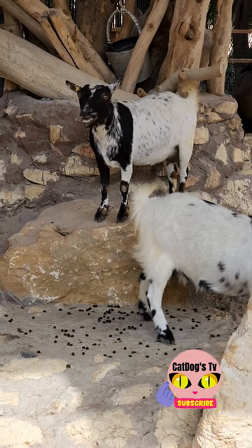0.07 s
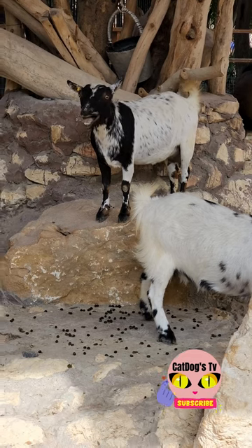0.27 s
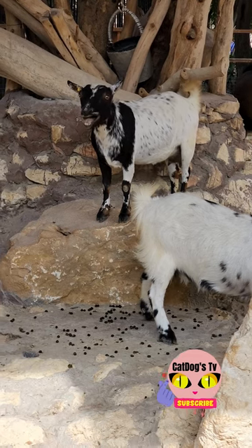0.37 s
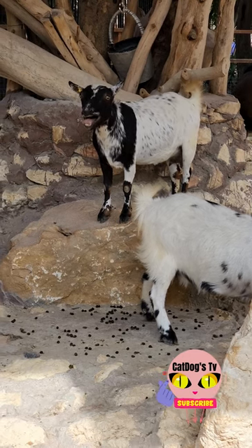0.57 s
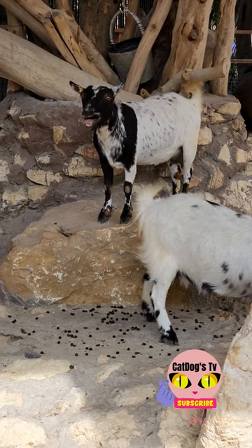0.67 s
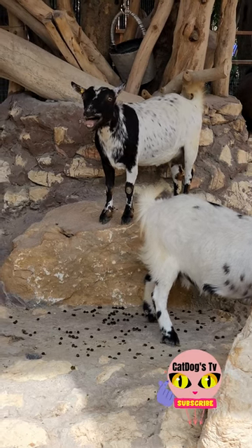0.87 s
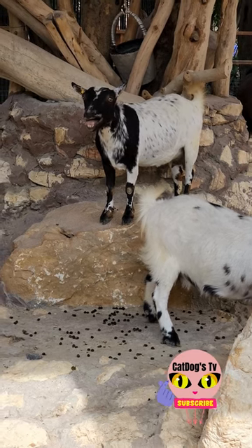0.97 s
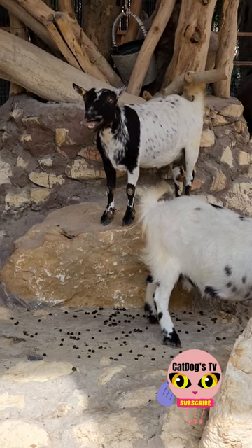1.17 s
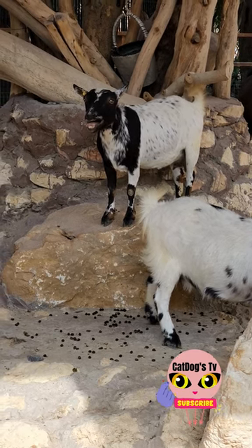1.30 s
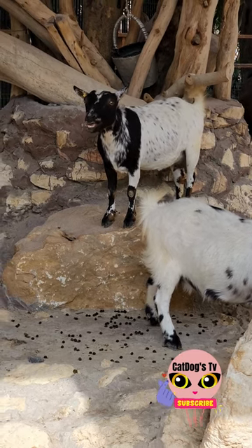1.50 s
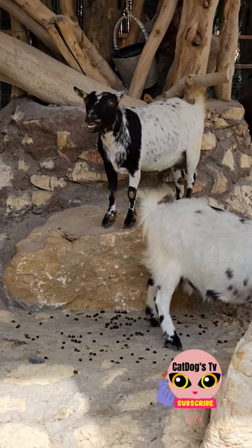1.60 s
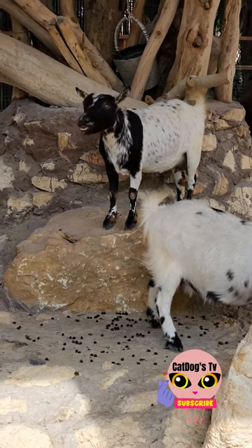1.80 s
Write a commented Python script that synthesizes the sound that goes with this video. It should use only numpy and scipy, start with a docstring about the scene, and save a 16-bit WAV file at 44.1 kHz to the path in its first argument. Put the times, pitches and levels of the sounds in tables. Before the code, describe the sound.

A goat bleats loudly outdoors, stuttering at first and then holding a long, hoarse cry.

```python
"""In a stone-walled pen, a few metres away, a goat bleats once: a stutter that grows hoarse, a long cry
that rings clear in its middle and breaks up again, then three weak last pulses. A thinner bleat from
the right overlaps the stutter, and a faint low tone slides up beneath its start. Each voice is a source
and a filter: uneven vocal-fold pulses and rasp excite the resonances of the throat.
The walls reflect both voices over a low outdoor rumble."""
import sys
import numpy as np
from scipy import signal
from scipy.fft import rfft, irfft, next_fast_len
from scipy.io import wavfile
from scipy.ndimage import uniform_filter1d

SR = 44100
rng = np.random.default_rng(int(sys.argv[2]) if len(sys.argv) > 2 else 0)


def store_wav(level_fs):
    """Save 16-bit WAV to argv[1]."""
    pcm = np.round(np.clip(np.atleast_2d(level_fs), -1, 1) * 32767)
    wavfile.write(sys.argv[1], SR, pcm.T.astype(np.int16))


N = 81585

# outdoor background spectrum: f/Hz, relative level/dB
AIR_SPECTRUM = [(20, -20), (45, -6), (75, 1.5), (105, -3.5), (160, -16.5), (300, -13.5), (500, -19),
                (1400, -17), (5000, -28.5), (15500, -43.5)]
# stutter pulses: middle t/s, length/s, pitch f/Hz, level/dB of the first resonance, mouth opening,
# second resonance and treble, roughness/(0-1)
STUTTER_PULSES = [(0.125, .034, 366, -23.5, -46, -29.5, -27, 0.24),
                  (.235, 0.054, 380.5, -26, -26, -20, -22.5, 0.33),
                  (0.351, 0.082, 389, -19.5, -29.5, -17.5, -21.5, 0.31),
                  (0.455, 0.063, 388.5, -19.5, -29.5, -14, -23, 0.37),
                  (0.565, 0.041, 390, -15.5, -22.5, -14, -16, 0.41),
                  (0.669, 0.056, 395, -21, -28, -20, -19.5, .85),
                  (0.777, 0.066, 388.7, -17, -23.5, -20, -16.5, .9),
                  (1.589, .04, 403.7, -25, -32, -33.5, -28, 0.6),
                  (1.688, 0.046, 373.6, -26, -65, -35.5, -27, 0.3),
                  (1.792, 0.026, 395, -44.5, -43, -32, -31.5, 0.17)]
# three bands of the throat's response in the stutter: f/Hz, relative level/dB
STUTTER_FIRST_FORMANT = [(150, -27), (380, -9.5), (560, -8.5), (780, 7.5), (1000, -3.5), (1400, -39.5)]
STUTTER_SECOND_FORMANT = [(1000, -56), (1350, 6), (1560, 13), (1850, -6.5), (2300, 0), (3000, -60)]
STUTTER_TREBLE_BAND = [(150, -27), (380, -17), (560, -22), (1500, -26), (2500, -4.5), (2900, 0),
                       (3500, 3.5), (4200, 1.5), (5400, -2.5), (6600, -20.5), (8300, -27.5), (10500, -38.5),
                       (15500, -41)]
# course of the nasal bleat: t/s, pitch f/Hz, level/dB
NASAL_CONTOUR = [(.1, 356.3, -34), (.18, 370, -67), (.29, 376, -48), (.38, 388, -32.5), (.415, 382, -26.5),
                 (.49, 386, -23), (.53, 392, -18.5), (.6, 397.8, -18), (.64, 389.3, -23.5), (.72, 382, -21),
                 (.8, 381.5, -26.5), (.86, 373.4, -21)]
# its throat response: f/Hz, relative level/dB
NASAL_THROAT = [(200, -30), (390, -10.5), (770, -1), (1150, -16.5), (1540, -1.5), (1950, -3.5),
                (2340, -2.5), (2700, -18.5), (4300, -10.5), (5600, -22.5), (15500, -63)]
# course of the low tone: t/s, pitch f/Hz, level/dB
SLIDE_CONTOUR = [(.1, 159.3, -70), (.14, 189, -36.5), (.19, 277.4, -39), (.24, 335, -41), (.3, 333, -88)]
# near-wall echoes: left delay t/s, right delay t/s, level/dB
WALL_ECHOES = [(.0047, .0052, -16), (0.0121, 0.0094, -7)]
# course of the cry: t/s, pitch f/Hz, first and second resonance level/dB, roughness/(0-1)
CRY_CONTOUR = [(.82, 356.1, -23, -14, 0.46), (.842, 376.7, -19.5, -15.5, 0.22),
               (.866, 412.8, -13, -12.5, 0.46), (.898, 381.4, -24.5, -25, 0.44),
               (.93, 406.2, -12.5, -15.5, 0.41), (.955, 426.2, -13, -15, 0.38),
               (.974, 394.2, -23, -15, 0.46), (1.0, 416.7, -10, -12, 0.18), (1.05, 415.4, -13, -17.5, 0.29),
               (1.075, 419.5, -10, -12, 0), (1.12, 422.2, -14, -19.5, 0.09), (1.165, 428, -10, -28.5, 0.1),
               (1.205, 438.2, -21.5, -17, 0.12), (1.25, 397.3, -13.5, -12, 0.49),
               (1.31, 401, -16.5, -15.5, .55), (1.365, 413.4, -15, -15.5, .53),
               (1.405, 413.3, -25.5, -19, 0.67), (1.43, 401.9, -16.5, -14, 0.55),
               (1.465, 390.4, -13, -13, 0.13), (1.496, 381.4, -22, -17.5, 0.24),
               (1.52, 329, -21.5, -30.5, 0.35), (1.53, 413, -24, -16, 0.57), (1.57, 377, -37, -39, .7)]
# throat response that shapes the cry's overtones: f/Hz, relative level/dB
CRY_OVERTONE_RESPONSE = [(150, -48), (280, -5.5), (410, -0.5), (540, 14), (850, -6), (1250, 1.5),
                         (1650, -2.5), (2100, 6.5), (2550, 2), (3000, 5), (3480, 11.5), (3980, -1.5),
                         (4330, -1), (4660, 6.5), (4980, -1), (5500, -2), (6200, -24), (7300, -12.5),
                         (8400, -10), (10500, -18.5), (15500, -23.5)]
# envelope of those overtones: t/s, level/dB
CRY_OVERTONE_LEVEL = [(.85, -15.5), (1.0, -18), (1.12, -19.5), (1.21, -16), (1.33, -19.5), (1.48, -17),
                      (1.57, -26)]
# the cry's shrill top resonance, which flares twice: t/s, level/dB
FLARE_LEVEL = [(1.16, -65), (1.185, -20.5), (1.225, -40), (1.25, -35), (1.37, -71), (1.4, -21.5),
               (1.44, -66)]
# phase difference between the two microphones: f/Hz, lead of left/rad
LEFT_PHASE_LEAD = [(100, -0.5), (830, 0), (1650, -0.54), (3000, -1.5), (4390, -4), (8000, -7)]
# their level difference: f/Hz, left-minus-right level/dB
LEFT_BALANCE = [(380, -6.5), (700, 1), (2400, 1.5), (5000, -1)]


def amp(db):
    """Amplitude ratio of a level in decibels."""
    return 10 ** (np.asarray(db) / 20)


def unit(x):
    """Normalisation to rms 1."""
    return x / np.sqrt(np.mean(x ** 2))


def curve(rows):
    """Linear interpolation of each column of a time table."""
    times, *columns = np.array(rows, float).T
    return [np.interp(np.arange(N) / SR, times, c) for c in columns]


def at_hz(points, hz):
    """Interpolation of a spectrum on a log-frequency axis."""
    f, value = np.array(points, float).T
    return np.interp(np.log(hz + 1e-9), np.log(f), value)


def shape(x, response):
    """Linear filtering: the spectrum is multiplied by a frequency response."""
    size = next_fast_len(2 * N)
    return irfft(rfft(x, size) * response(np.fft.rfftfreq(size, 1 / SR)), size)[..., :N]


def colour(x, points):
    """Spectral weighting by a table of levels, at rms 1."""
    return unit(shape(x, lambda f: amp(at_hz(points, f))))


def resonance(x, hz, width_hz):
    """A formant: two resonators in cascade, held near rms 1 as the pitch moves."""
    ring = shape(x, lambda f: (1j * f * width_hz / (hz ** 2 - f ** 2 + 1j * f * width_hz)) ** 2)
    return ring / np.sqrt(uniform_filter1d(ring ** 2, size=600) + 1e-12)


def wander(bandwidth_hz):
    """Smooth random fluctuation: low-passed noise at rms 1."""
    return unit(shape(rng.standard_normal(N), lambda f: np.exp(-(f / bandwidth_hz) ** 2)))


def outdoor_air(level_db=-34.5, widening_hz=1120):
    """Partly coherent noise: a rumble alike in both ears under a faint wide hiss."""
    mid, side = rng.standard_normal((2, N))
    side = shape(side, lambda f: np.minimum(f / widening_hz, .8))
    return amp(level_db) * colour(mid + side * np.array([[1], [-1]]), AIR_SPECTRUM)


def vocal_folds(hz, rough, harmonics=40, jitter=.065, flutter=.053, catch=3.08, rasp_hz=2340):
    """Glottal source: roughness unsettles the pulses, makes them catch and adds a puff of rasp to each."""
    unrest = np.abs(rough) ** 1.6
    pitch_hz = hz * (1 + jitter * unrest * wander(92.5))
    phase = 2 * np.pi * (np.cumsum(pitch_hz) / SR + flutter * unrest * wander(310))
    tone = unit(sum(np.cos(k * phase + 2 * np.pi * k * k / np.sqrt(2 * harmonics))
                    for k in range(1, harmonics + 1)))
    puffs = unit(rng.standard_normal(N) * (1 + .5 * np.cos(phase)))
    puffs = shape(puffs, lambda f: np.sqrt(1 + np.minimum(f / rasp_hz, 1)))
    rasp = unrest ** 2 / np.maximum(1.05 - rough, .1)
    catches = 1 / (1 + (catch * rough * np.maximum(wander(162), 0)) ** 2)  # dips of a cycle or two
    return (tone * catches + rasp * puffs) / np.sqrt(1 + rasp ** 2)


def stutter(scoop_hz_per_s=950, sag_hz_per_s=150, swing_s=.04, opening_lead_s=.011):
    """Amplitude and frequency modulation: about nine pushes of voice a second, each arching in pitch."""
    t = np.arange(N) / SR
    gains, contour = 0, []
    for middle, length, hz, *levels_db, rough in STUTTER_PULSES:
        away = np.abs(2 * (t - middle) / length)
        swell, hold = np.exp(-away ** 2), np.exp(-away ** 4 / 2)
        # the half-open mouth rings just before the pulse peaks
        early = np.exp(-(2 * (t - middle + opening_lead_s) / length) ** 2)
        gains = gains + amp(levels_db)[:, None] * np.array([swell, early, swell, hold])
        contour += [(middle - swing_s, hz - scoop_hz_per_s * swing_s, rough),
                    (middle, hz, rough),
                    (middle + swing_s, hz - sag_hz_per_s * swing_s, rough)]
    voice = vocal_folds(*curve(contour))
    first, opening, second, treble = gains
    return (first * colour(voice, STUTTER_FIRST_FORMANT)
            + opening * resonance(voice, hz=1137, width_hz=270)
            + second * colour(voice, STUTTER_SECOND_FORMANT)
            + treble * colour(voice, STUTTER_TREBLE_BAND))


def nasal_bleat():
    """Source and fixed filter: a thinner, nasal voice, probably a second goat."""
    t = np.arange(N) / SR
    hz, db = curve(NASAL_CONTOUR)
    sounding = uniform_filter1d(1. * (t > NASAL_CONTOUR[0][0]) * (t < NASAL_CONTOUR[-1][0]), size=800)
    return sounding * amp(db) * colour(vocal_folds(hz, rough=.1595), NASAL_THROAT)


def low_slide(jitter=.11):
    """Frequency modulation of a sine: a faint, unsteady tone rises as the bleat begins."""
    hz, db = curve(SLIDE_CONTOUR)
    cycles = np.cumsum(hz * (1 + jitter * wander(100))) / SR
    return amp(db) * np.sqrt(2) * np.sin(2 * np.pi * cycles)


def pen_echoes(x, tail_delay_s=.0085):
    """Reflection from two near walls; scattering by rough stone and timber adds an exponential tail."""
    t = np.arange(N) / SR
    echoes = sum(amp(db) * shape(x, lambda f: np.exp(-2j * np.pi * f * np.array([[left], [right]])))
                 for left, right, db in WALL_ECHOES)
    low_tail = (.29, -2, lambda f: 1 / np.hypot(1, (f / 1800) ** 2))
    treble_tail = (.39, -3, lambda f: np.exp(-((f - 3500) / 2300) ** 2))
    for t60_s, db, band in (low_tail, treble_tail):
        tail = rng.standard_normal((2, N)) * np.exp(-np.log(1000) * t / t60_s) * (t > tail_delay_s)
        tail = shape(unit(tail) / np.sqrt(N), band)
        echoes = echoes + amp(db) * signal.fftconvolve(x[None], tail, axes=1)[:, :N]
    return echoes


def cry(start_s=.825, end_s=1.56, fade_s=.008):
    """Formant resonance: the open mouth reinforces the second and fourth harmonics, with overtones above."""
    t = np.arange(N) / SR
    hz, first_db, second_db, rough = curve(CRY_CONTOUR)
    voice = vocal_folds(hz, rough)
    overtone_db, flare_db = curve(CRY_OVERTONE_LEVEL) + curve(FLARE_LEVEL)
    sounding = np.clip(np.minimum(t - start_s, end_s - t) / fade_s + .5, 0, 1)
    return sounding * (amp(first_db) * resonance(voice, hz=835, width_hz=280)
                       + amp(second_db) * resonance(voice, hz=1573, width_hz=338)
                       + amp(flare_db) * resonance(voice, hz=5450, width_hz=550)
                       + amp(overtone_db) * colour(voice, CRY_OVERTONE_RESPONSE))


def scene(nasal_right_excess_db=5, nasal_left_lead_s=.00012):
    """Superposition at two microphones: both voices, their echoes, the low tone and the background."""
    goat, nasal = stutter() + cry(), nasal_bleat()
    sides = np.array([[.5], [-.5]])  # left and right each take half of a difference
    goat_direct = shape(goat, lambda f: amp(sides * at_hz(LEFT_BALANCE, f))
                        * np.exp(1j * sides * at_hz(LEFT_PHASE_LEAD, f)))
    nasal_shifted = shape(nasal, lambda f: np.exp(2j * np.pi * f * sides * nasal_left_lead_s))
    nasal_direct = amp(-sides * nasal_right_excess_db) * nasal_shifted
    return goat_direct + nasal_direct + pen_echoes(goat + nasal) + low_slide() + outdoor_air()


def record(dry, cutoff_hz=15900):
    """Soft saturation rounds the loudest peaks; a steep low-pass cuts the top."""
    rounded = dry / (1 + dry ** 8) ** (1 / 8)
    return signal.sosfilt(signal.ellip(10, .2, 80, cutoff_hz, fs=SR, output="sos"), rounded)


dry = scene()
out = record(dry)
store_wav(out)
```